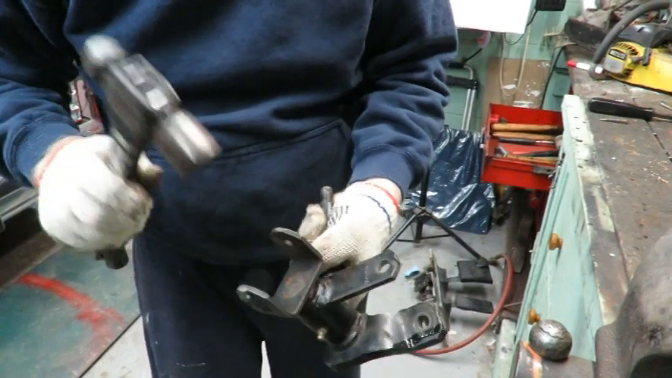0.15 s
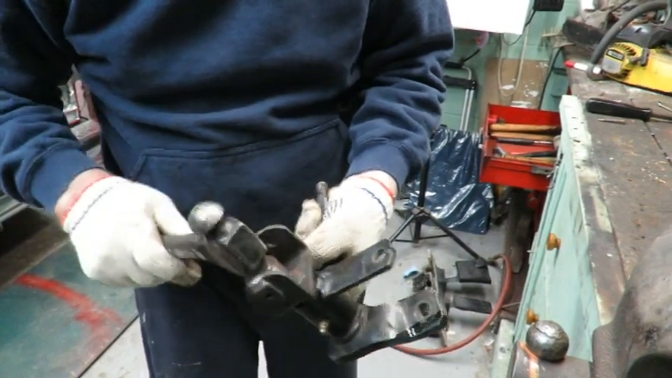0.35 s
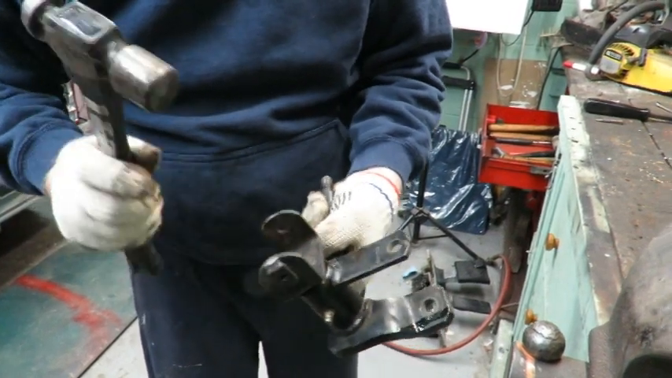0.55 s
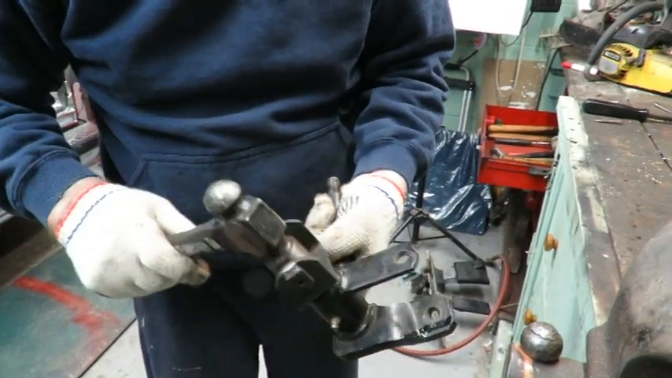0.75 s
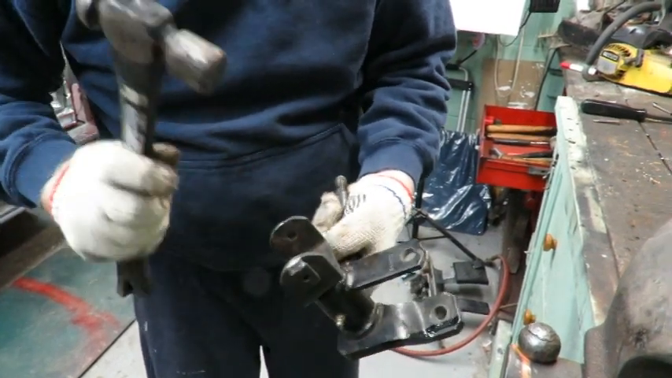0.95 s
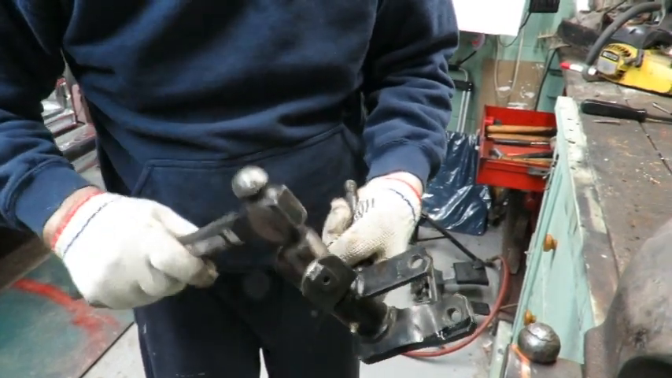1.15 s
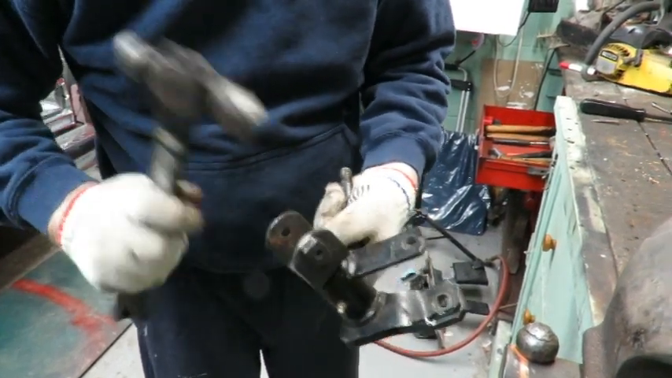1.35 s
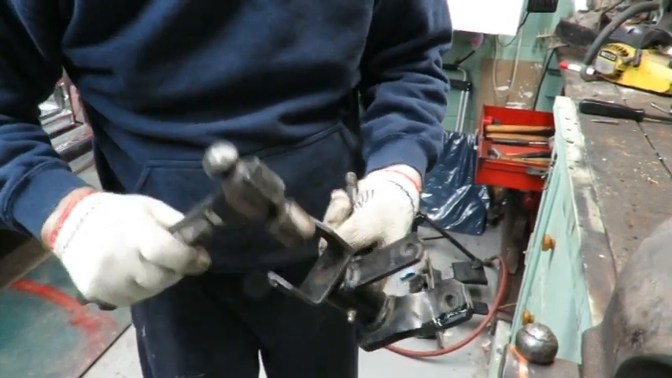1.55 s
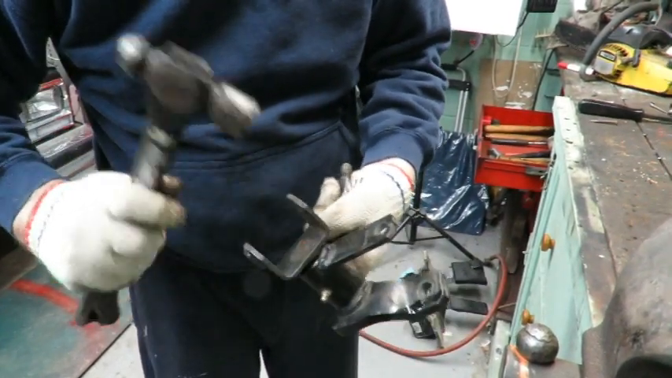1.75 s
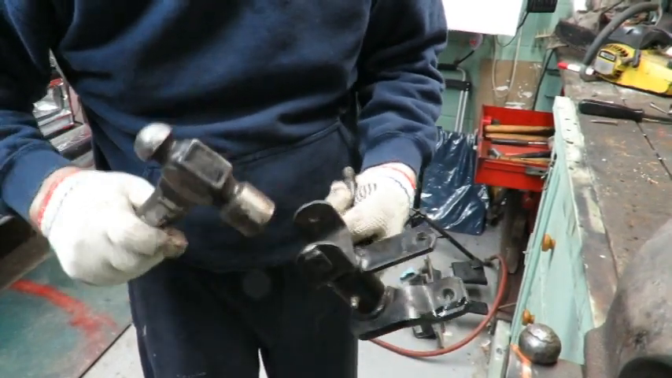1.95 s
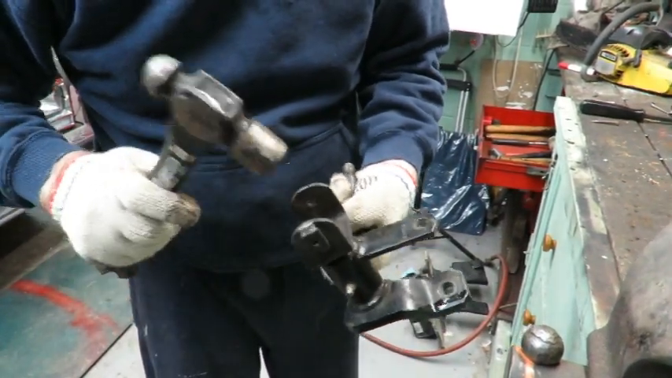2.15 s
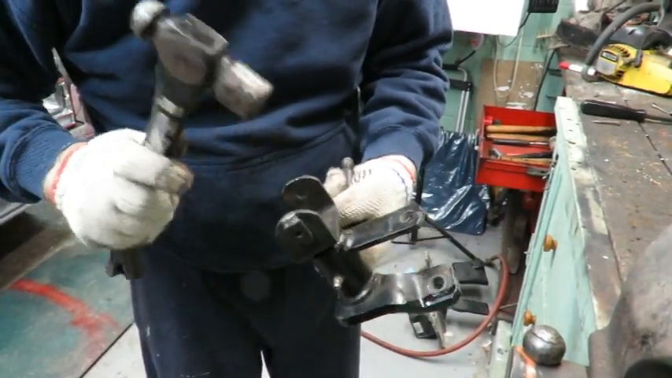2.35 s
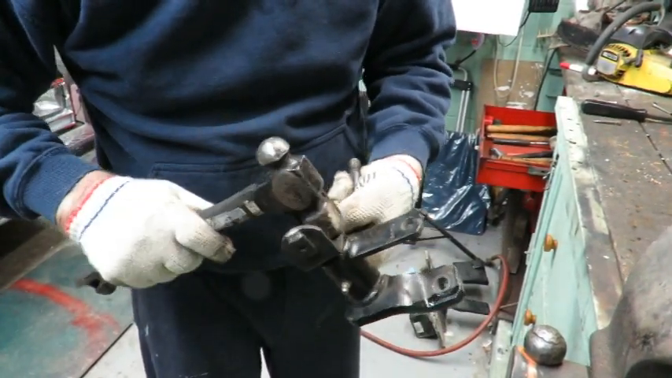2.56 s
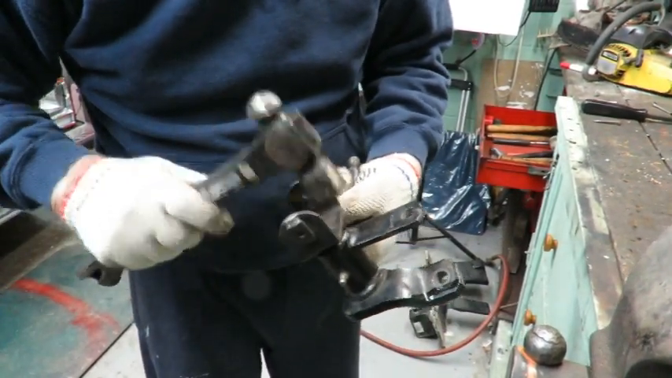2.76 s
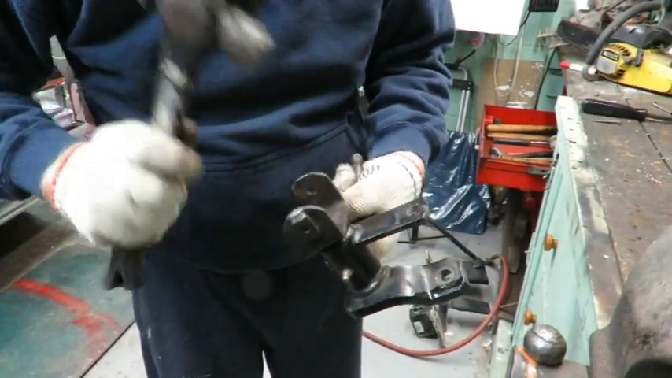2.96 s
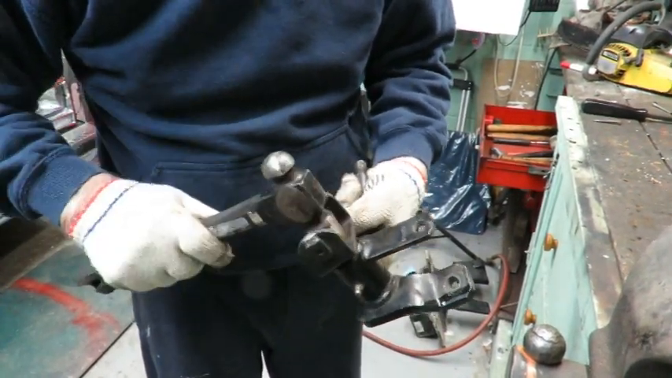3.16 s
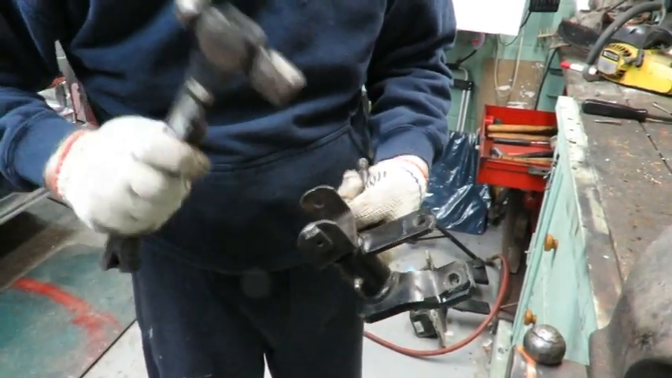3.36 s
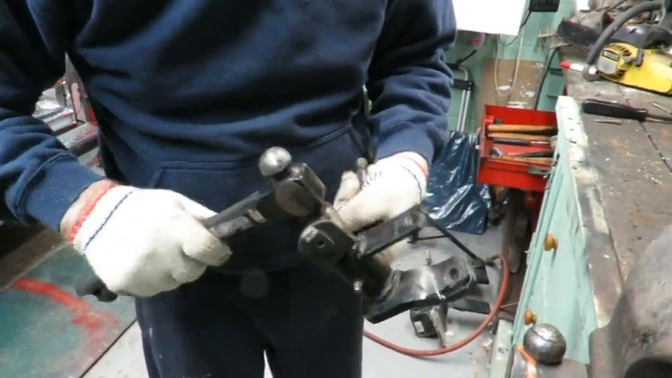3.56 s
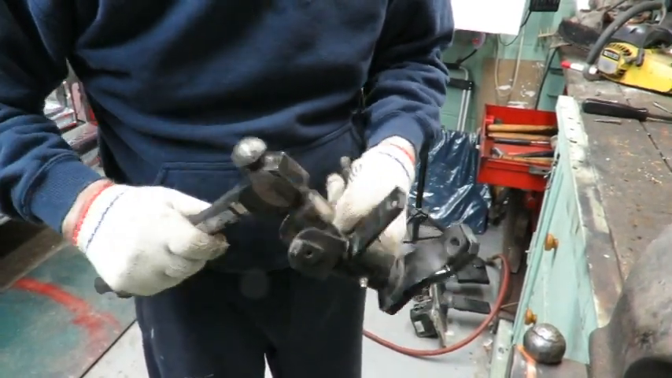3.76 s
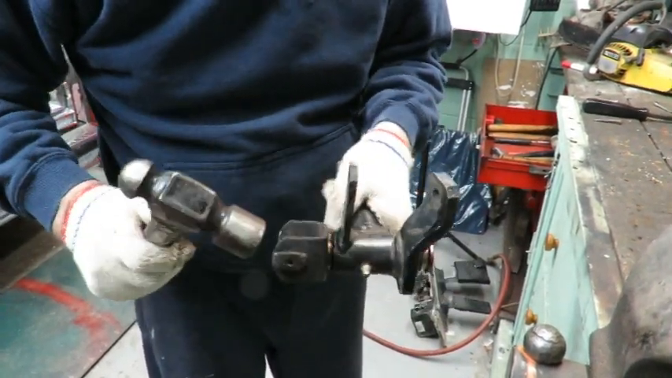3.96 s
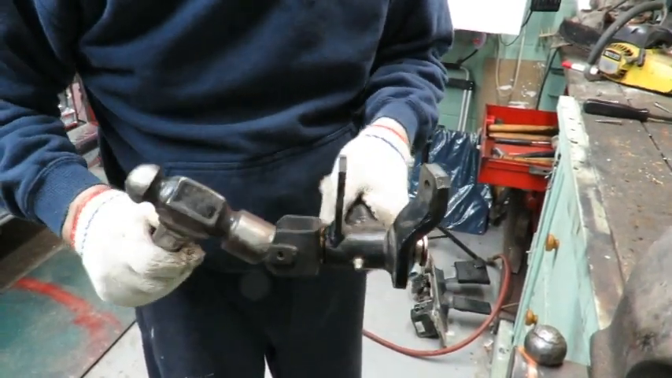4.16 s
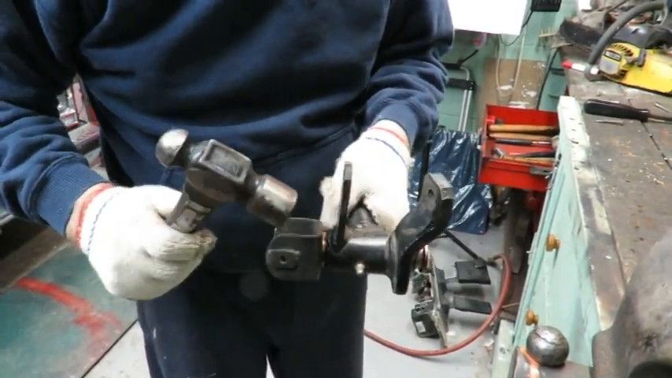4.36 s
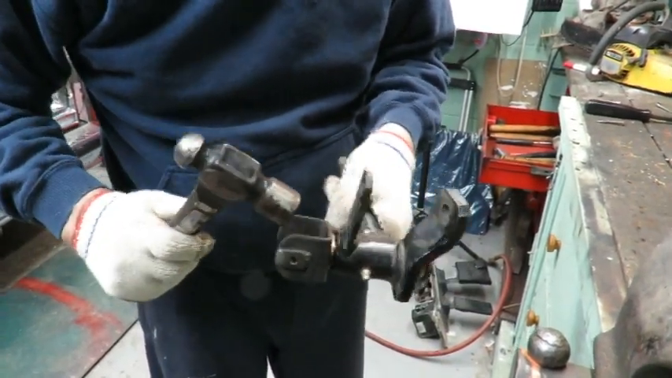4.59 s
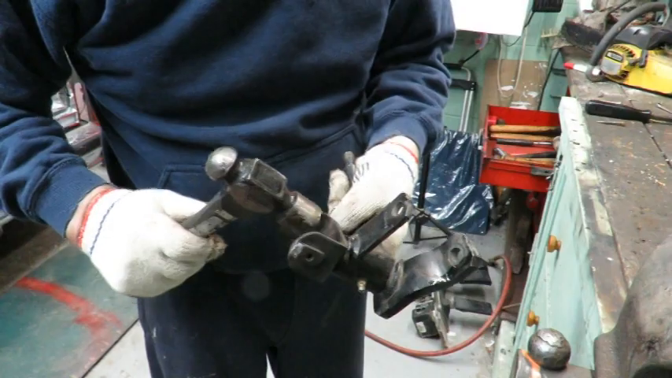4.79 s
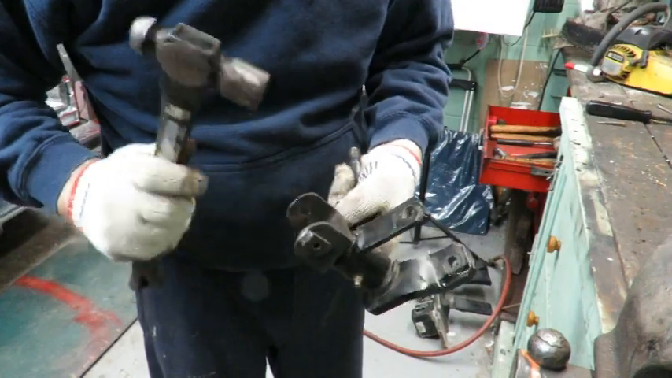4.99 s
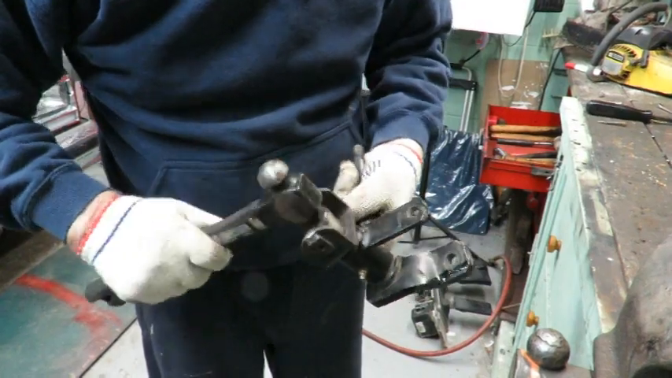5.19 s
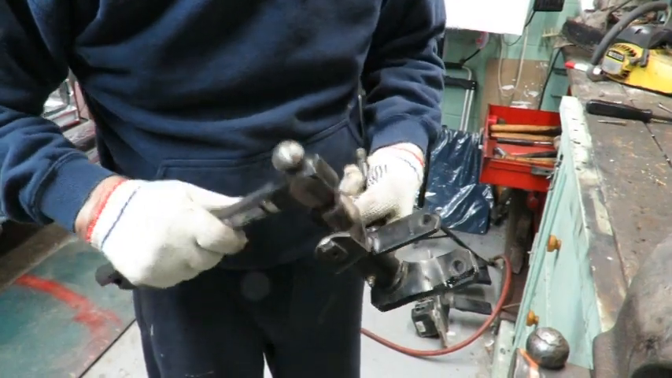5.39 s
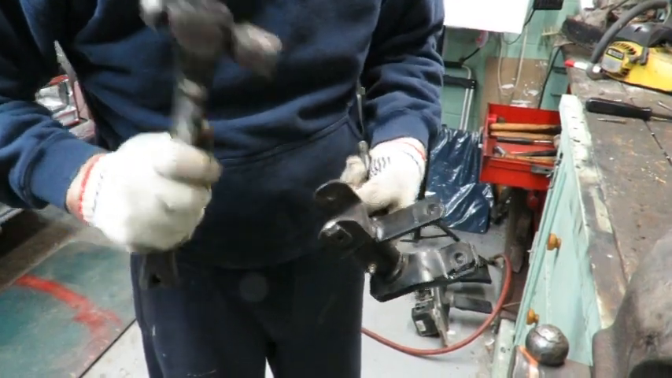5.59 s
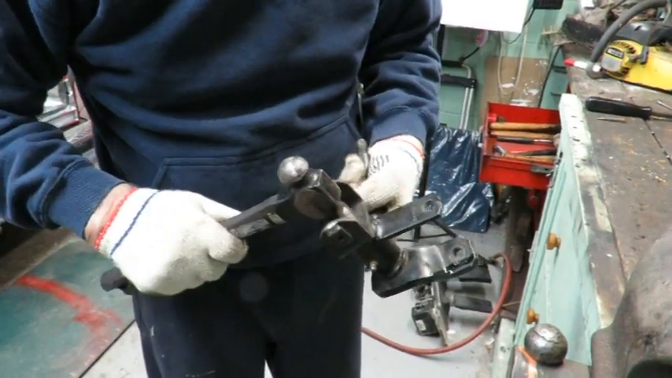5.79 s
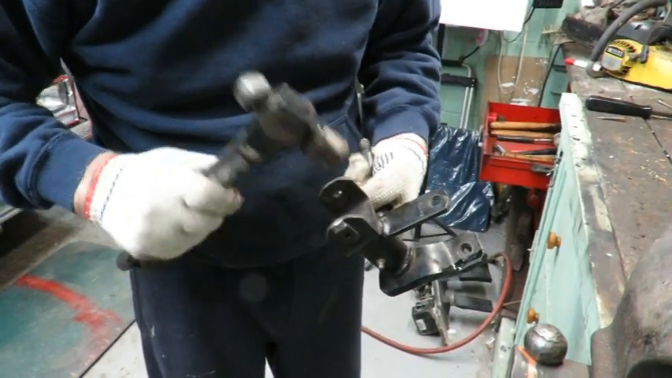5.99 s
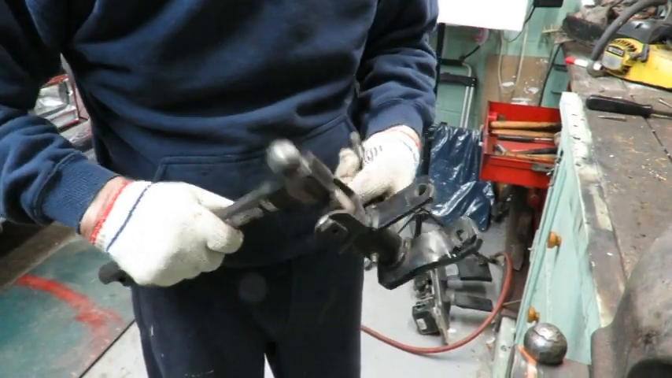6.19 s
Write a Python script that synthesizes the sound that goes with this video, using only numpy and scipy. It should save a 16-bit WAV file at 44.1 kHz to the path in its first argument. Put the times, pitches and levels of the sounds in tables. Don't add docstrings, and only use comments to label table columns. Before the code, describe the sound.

A ball-peen hammer strikes a handheld steel bracket in sharp, ringing, overloading blows, with short workshop echoes over a faint dull hum.

```python
import sys
import numpy as np
from scipy import signal
from scipy.fft import rfft, irfft
from scipy.io import wavfile
from scipy.ndimage import uniform_filter1d

SR = 44100
rng = np.random.default_rng(int(sys.argv[2]) if len(sys.argv) > 2 else 0)


def int16_out(signal):
    q = np.round(np.clip(np.atleast_2d(signal).T, -1, 1) * 32767)
    wavfile.write(sys.argv[1], SR, q.astype(np.int16))


def volts_from_decibels(level):
    exponent = np.asarray(level, float) / 20
    return 10 ** exponent


N = 274875

# (time [s], crack [dB], bracket arms [dB], main ring [dB], pin [dB])
BLOWS = [(0.086, 0.5, -46.5, -36.5, -33.5), (0.4224, -4.5, -28, -23, -27.5),
         (0.7684, 0.5, -33.5, -18.5, -23), (1.1597, 0.5, -36, -22, -26), (1.5306, -1.5, -32, -28, -33.5),
         (1.9364, -4.5, -28.5, -30, -33.5), (2.6053, 1.5, -34, -10.5, -21.5),
         (3.1403, 1.5, -32.5, -12, -17.5), (3.637, 2.5, -34.5, -16.5, -31), (5.2333, 4.5, -27, -12, -34),
         (5.788, 3.5, -33.5, -13, -24.5)]
# (drive into bushing [dB], neck [dB], face [dB], peen [dB])
LANDINGS = [(-19, -32.5, -21.5, -21), (-27.5, -28.5, -22.5, -28), (-18.5, -29.5, -23.5, -16.5),
            (-23, -29.5, -17.5, -19.5), (-31.5, -36, -29.5, -21), (-31.5, -39, -26, -23.5),
            (-36, -24, -20.5, -17.5), (-15, -26.5, -16, -19.5), (-19.5, -15.5, -23, -22),
            (-26, -17, -23, -11.5), (-25.5, -32.5, -22.5, -17.5)]
# (crack [dB], arms [dB], main ring [dB], pin [dB])
EARLIER_BLOW = (-17.5, -34.5, -13, -30)
# (time [s], crack loss [dB], ring loss [dB])
BOUNCES = [
    (.0912, 9.5, 8.5),
    (0.4125, 9.5, 17),
    (0.428, 0.5, 4.5),
    (0.4445, 6, 18.5),
    (1.176, 10.5, 11.5),
    (1.5269, 10.5, 10.5),
]
# (time [s], crack [dB], ring [dB], favoured pitch [Hz], hammer face [dB])
TAPS = [
    (3.903, -43, -43, 1660, -87),
    (6.0636, -34.5, -49.5, 2110, -68),
]
# (time [s], level [dB])
KNOCKS = [
    (.905, -42.5),
    (1.161, -32),
    (1.531, -19),
    (1.937, -23),
    (3.904, -60),
]

# (pitch [Hz], level [dB], time to fall 60 dB [s])
ARMS = [(1121, -8.5, 0.4), (1294, -12, 0.1), (1890, -10, 0.047), (2450, -8, 0.05)]
MAIN_RING = [(4243, -10, 0.35), (4250, 7.5, .035), (4300, -13, .27), (4215, -13, .2), (4978, -27, .3)]
PIN = [(6102, -2, .2), (5590, -5, .17), (5328, -5, .2)]
BUSHING = [(6460, -5, 0.21), (7120, -11.5, 0.14)]
# (pitch [Hz], level [dB], time to fall 60 dB [s])
HEAD = [(2021, -5, 0.14), (8560, -4, 0.12), (10540, -1.5, 0.15), (11560, -6, .13), (13550, -2, 0.1)]
# (pitch [Hz], level [dB], time to fall 60 dB [s])
HEAD_PARTNERS = [(3020, -4, .045), (8450, 0, .02), (10570, 2, .015), (11600, -2, .02), (14245, -7, .09)]

# (frequency [Hz], level [dB per Hz])
CRACK_COLOUR = [(150, -39), (500, -19.5), (900, -14.5), (1300, -0.5), (2200, 0), (3300, 3), (5000, 0),
                (8000, -5), (12000, -7), (14500, -16), (15500, -36), (17000, -52)]
# (time [s], opposite left-right [dB], same left-right [dB], pitch [Hz])
THUMPS = [(0.087, -2, -14.5, 524.3), (0.0924, -12.5, -14.5, 303), (1.162, -10, -11.5, 750),
          (1.1751, -24, -16, 273), (1.53, -16.5, -21, 444), (2.607, -19, -30.5, 449),
          (2.607, -12, -15.5, 179.9), (3.1395, -4.5, -14.5, 452), (3.638, -3.5, -6.5, 423.4),
          (5.2339, -14, -10, 604.8), (5.236, -7.5, -12.5, 235.5), (5.7885, -3, -4, 425.2)]
# (frequency [Hz], time to fall 60 dB [s])
ROOM_T60 = [(300, 0.57), (1000, 0.35), (3000, 0.34), (6000, .32), (10000, .24), (15000, 0.3)]
# (frequency [Hz], likeness [-1 to 1])
ROOM_LIKENESS = [(60, 0.23), (180, 0.93), (550, 0.55), (1650, 0.96), (4970, 0.31), (15000, 0.093)]
# (frequency [Hz], level [dB per Hz])
HUM_COLOUR = [(15, -42.5), (25, -21), (76, -2.5), (114, -10), (180, -1), (236, -6), (394, -7.5),
              (575, -10.5), (624, -10), (1190, -14.5), (5430, -37), (9570, -45.5), (16000, -58.5)]
# (frequency [Hz], likeness [-1 to 1])
HUM_LIKENESS = [(60, 0.98), (180, 1), (550, 0.079), (1650, 0.35), (4970, 0.72), (15000, -0.11)]

LEAD = 16000
EARLIER_S, TRAVEL_S = 0.26, 0.0006
HANDLE_OVER_ARMS_DB, TOP_OVER_PEEN_DB = 5.5, -10
TAP_SLOPE_DB = 22
KNOCK_UNDER_CRACK_DB = 38.5
WOBBLE_DB, WOBBLE_HZ = 2.5, 35
CRACK_T60_S, THUMP_T60_S = 0.025, 0.006
ROOM_DB = -8
HUM_START_DB, HUM_SUNK_DB = -64, -82
SINK_SHARE = 0.61
SINK_S, HOLD_S, RECOVER_DB_PER_S = 0.08, 0.19, 10.5
DUCK_DB, DUCK_S = 7.5, 0.0051


def rms_one(x):
    return x / np.sqrt(np.mean(x ** 2) + 1e-20)


def at_hz(points, hz):
    point_hz, value = np.array(points).T
    return np.interp(np.log(hz), np.log(point_hz), value)


def filtered(x, order, hz, kind="low"):
    return signal.sosfilt(signal.butter(order, hz, kind, fs=SR, output="sos"), x)


def banded_noise(size, likeness, gain):
    out, edges = 0, 22 * 2 ** np.arange(0, 9.7, 1 / 3)
    white = rng.standard_normal((2, 2, size))
    for k, (low, high) in enumerate(zip(edges, edges[1:])):
        mid, side = filtered(white[k % 2], 2, [low, high], "band")
        hz = np.sqrt(low * high)
        alike = np.clip(at_hz(likeness, hz), -1, 1)
        stereo = np.sqrt(1 + alike) * mid + np.sqrt(1 - alike) * side * [[1], [-1]]
        out = out + gain(hz) * stereo
    return out


def hum_level_db():
    thump_s, thump_db = np.array(THUMPS)[:, :2].T
    points, free_s = [(0.0029, HUM_START_DB)], 0
    for s in [*np.array(BLOWS)[:, 0], N / SR]:
        before = points[-1][1] + RECOVER_DB_PER_S * max(s - free_s, 0)
        overloads_db = thump_db[abs(thump_s - s) < 0.03]
        kept = np.prod(1 - np.clip(SINK_SHARE * volts_from_decibels(overloads_db), 0, 1))
        after = HUM_SUNK_DB + kept * (before - HUM_SUNK_DB)
        free_s = s + HOLD_S
        points += [(s, before), (s + SINK_S, after), (free_s, after)]
    return np.interp(np.arange(N) / SR, *np.transpose(points))


def shop_hum():
    lumps = rms_one(filtered(rng.standard_normal(N), 2, 9))
    hum = rms_one(banded_noise(N, HUM_LIKENESS, lambda hz: volts_from_decibels(at_hz(HUM_COLOUR, hz))))
    return filtered(hum, 2, 45, "high") * volts_from_decibels(hum_level_db() + 0.31 * lumps)


def contacts():
    s, crack_db, arms, main, pin = np.transpose(BLOWS)
    bushing, neck, face, peen = np.transpose(LANDINGS)
    handle, top = arms + HANDLE_OVER_ARMS_DB, peen + TOP_OVER_PEEN_DB
    blows = np.transpose([s, crack_db, arms, main, pin, bushing, handle, neck, face, peen, top])

    bounces = []
    for at, crack_loss_db, ring_loss_db in BOUNCES:
        nearest = blows[np.argmin(abs(s - at)), 1:]
        bounces.append((at, *(nearest - np.r_[crack_loss_db, np.full(9, ring_loss_db)])))

    bracket_hz = [modes[0][0] for modes in [ARMS, MAIN_RING, PIN, BUSHING]]
    part_hz = np.array(bracket_hz + [mode[0] for mode in HEAD[:2]])
    taps = []
    for at, tick_db, level_db, hz, face_db in TAPS:
        parts_db = level_db - TAP_SLOPE_DB * abs(np.log2(part_hz / hz))
        taps.append((at, tick_db, *parts_db, face_db, face_db, face_db + TOP_OVER_PEEN_DB))

    earlier = (-EARLIER_S, *EARLIER_BLOW, EARLIER_BLOW[-1], *np.full(len(HEAD), -120))
    return np.array(sorted([earlier, *map(tuple, blows), *bounces, *taps]))


def clicks(times, sizes):
    out = np.full(N + LEAD, 1e-18)
    at = np.round((np.asarray(times) + TRAVEL_S) * SR).astype(int) + LEAD
    np.add.at(out, at, sizes)
    return out


def ring(x, hz, t60):
    shrink, turn = volts_from_decibels(-60 / (t60 * SR)), 2 * np.pi * hz / SR
    return signal.lfilter([0, np.sin(turn)], [1, -2 * shrink * np.cos(turn), shrink ** 2], x)


def wobble(rate_hz):
    low_pass = signal.butter(2, rate_hz, fs=SR / 50, output="sos")
    slow = signal.sosfilt(low_pass, rng.standard_normal((N + LEAD) // 50 + 1))
    return np.repeat(rms_one(slow), 50)[:N + LEAD]


def radiate(struck, hz, t60):
    lean_db = np.clip(hz / 3500, 0, 4) * rng.choice([-1, 1]) * np.array([[0.5], [-0.5]])
    waver = uniform_filter1d(volts_from_decibels(WOBBLE_DB * wobble(WOBBLE_HZ)), size=50)
    return volts_from_decibels(lean_db) * ring(struck * volts_from_decibels(-2), hz, t60) * waver


def steel():
    rows, out = contacts(), 0
    for column, modes in enumerate([ARMS, MAIN_RING, PIN, BUSHING], start=2):
        for k, (hz, level_db, t60) in enumerate(modes):
            chance_db = (k > 1) * 2.5 * rng.standard_normal(len(rows))
            struck = clicks(rows[:, 0], volts_from_decibels(rows[:, column] + level_db + chance_db))
            out = out + radiate(struck, hz, t60)
    for column, pair in enumerate(zip(HEAD, HEAD_PARTNERS), start=6):
        for hz, level_db, t60 in pair:
            struck = clicks(rows[:, 0], volts_from_decibels(rows[:, column] + level_db))
            out = out + radiate(struck, hz, t60)
    return filtered(out, 2, 700, "high")


def coloured(x):
    hz = np.linspace(1, SR / 2, x.shape[-1] // 2 + 1)
    return irfft(rfft(x) * volts_from_decibels(at_hz(CRACK_COLOUR, hz)), x.shape[-1])


def crack():
    rows = contacts()
    burst = average = 0
    mid, side = rms_one(coloured(rng.standard_normal((2, N + LEAD))))
    noise = mid + volts_from_decibels(-10) * side * np.array([[1], [-1]])
    hard = rows[:, 1] > -13
    for chosen, top_hz in [(hard, 15000), (~hard, 4500)]:
        struck = clicks(rows[chosen, 0], volts_from_decibels(rows[chosen, 1] - 13))
        envelope = signal.lfilter([1], [1, -volts_from_decibels(-60 / (CRACK_T60_S * SR))], struck)
        burst = burst + filtered(noise * envelope, 2, [600, top_hz], "band")
        average = average + filtered(coloured(struck), 1, top_hz * 1.4)
    return burst, volts_from_decibels(25) * average


def knocks():
    with_cracks = contacts()[:, :2] - [0, KNOCK_UNDER_CRACK_DB]
    s, level_db = np.transpose([*KNOCKS, *with_cracks])
    return filtered(clicks(s, volts_from_decibels(level_db + 25.5)), 2, [320, 950], "band")


def workshop(x):
    s = np.arange(SR // 2) / SR
    echoes = banded_noise(len(s), ROOM_LIKENESS, lambda hz: volts_from_decibels(-60 * s / at_hz(ROOM_T60, hz)))
    echoes = echoes * (1 - np.exp(-(s / 0.0022) ** 2))
    echoes = echoes / np.sqrt(np.sum(echoes ** 2) / 2)
    return signal.fftconvolve(x[None], echoes, axes=1)[:, :N + LEAD]


def thumps():
    opposite, alike, s = np.zeros(N), np.zeros(N), np.arange(SR // 25) / SR
    envelope = 2 * (1 - np.exp(-s / 0.00016))
    for start, opposite_db, alike_db, hz in THUMPS:
        turn = 2 * np.pi * 1.4 * hz * 0.0046 * (1 - np.exp(-s / 0.0042))
        i = round(start * SR)
        swing = envelope * np.sin(turn)
        push = envelope * (np.cos(1.5 * turn) + 0.5)
        opposite[i:i + len(s)] -= volts_from_decibels(opposite_db - 30 * s / THUMP_T60_S) * swing
        alike[i:i + len(s)] += volts_from_decibels(alike_db + 1.5 - 36 * s / THUMP_T60_S) * push
    opposite = filtered(opposite, 1, 120, "high")
    alike = filtered(alike, 2, 120, "high")
    return alike + opposite * [[1], [-1]]


def scene():
    hum, rings, (burst, average), knock = shop_hum(), steel(), crack(), knocks()
    echoes = workshop(volts_from_decibels(-3) * rings.mean(axis=0) + average + knock)
    hammering = rings + burst + 0.28 * knock + volts_from_decibels(ROOM_DB) * echoes
    return hammering[:, LEAD:] + hum


def band_limit(x):
    return signal.sosfilt(signal.butter(12, 16440, fs=SR, output="sos"), x)


def record(dry):
    s, crack_db = contacts()[1:, :2].T
    struck = clicks(s, np.clip((crack_db + 4) / 12, 0, 1))[LEAD:]
    late = np.minimum(signal.lfilter([1], [1, -np.exp(-1 / (DUCK_S * SR))], struck), 1)
    dry = signal.sosfilt(signal.cheby2(5, 26, 15800, fs=SR, output="sos"), dry)
    loud = dry * volts_from_decibels(DUCK_DB * late) + thumps()
    flattened = loud / (1 + np.abs(loud / 1.02) ** 8) ** (1 / 8)
    return band_limit(flattened)


dry = scene()
out = record(dry)
int16_out(out)
```